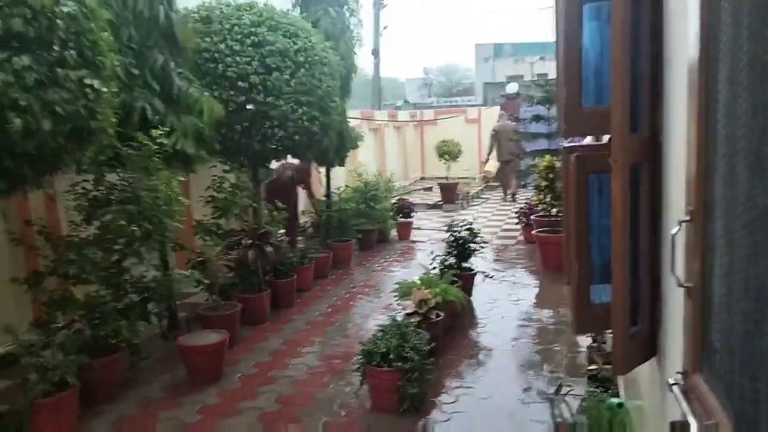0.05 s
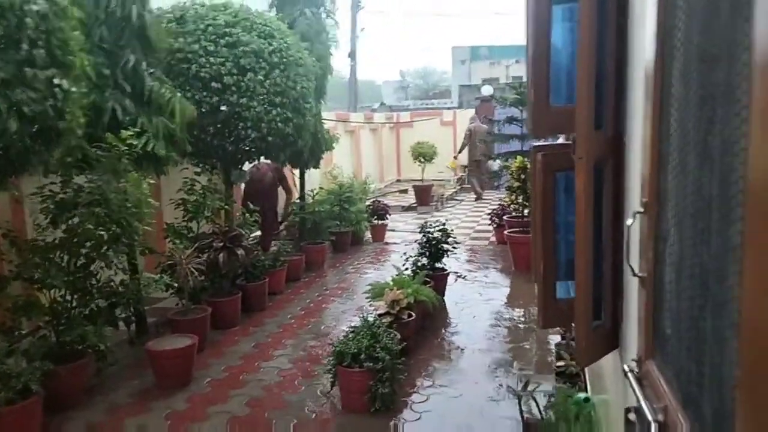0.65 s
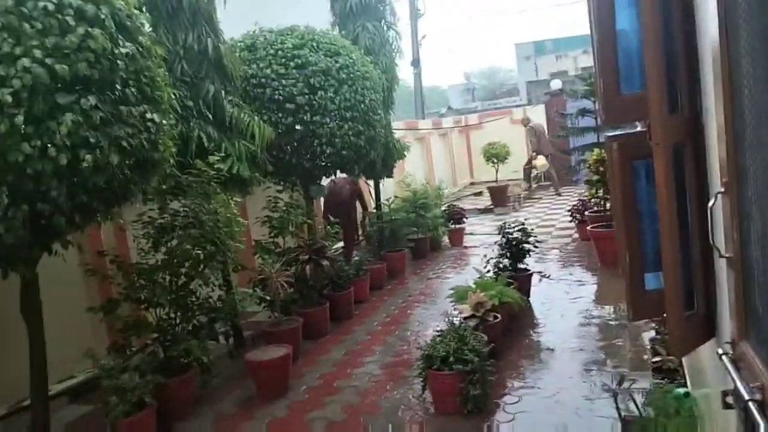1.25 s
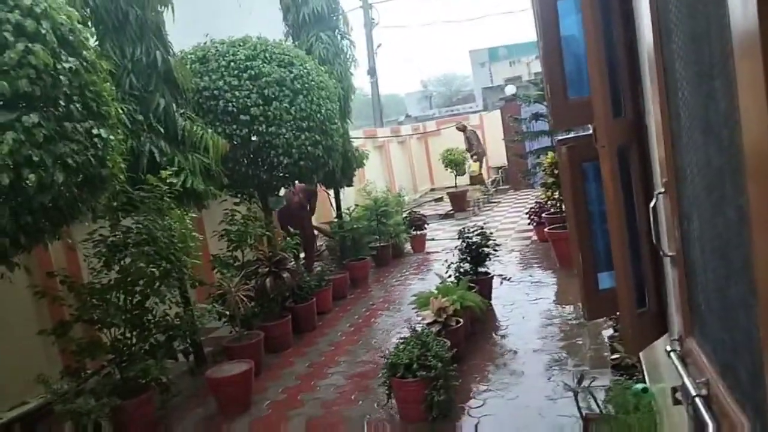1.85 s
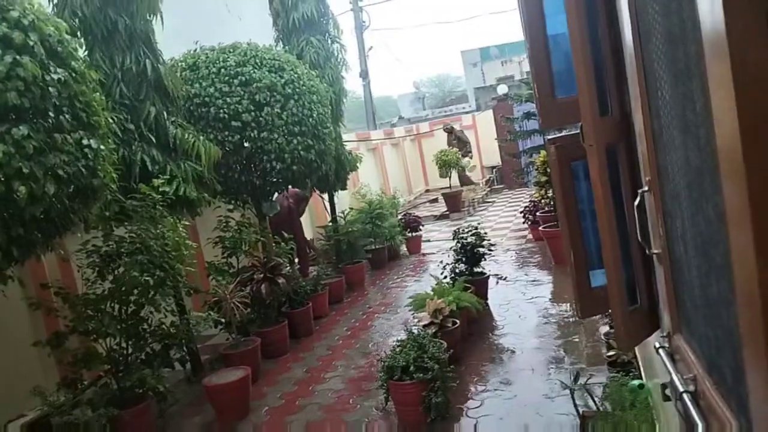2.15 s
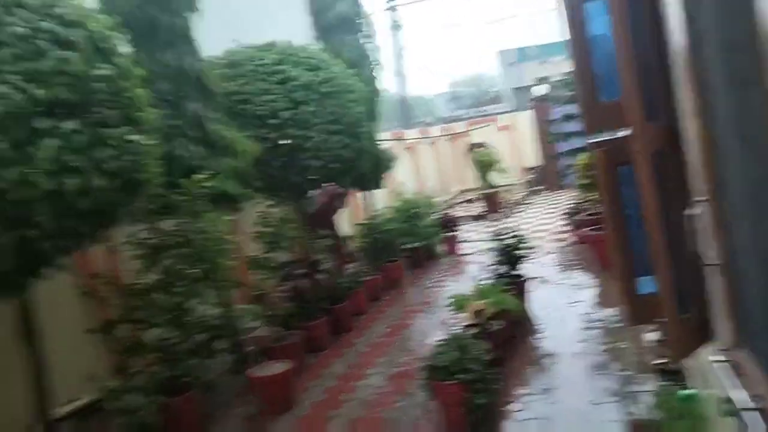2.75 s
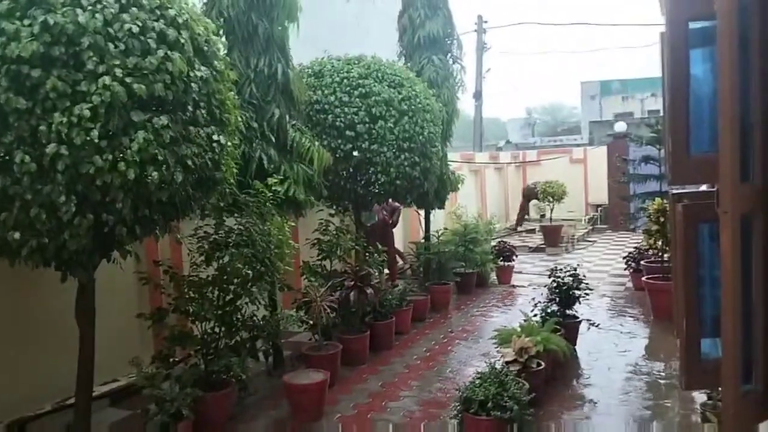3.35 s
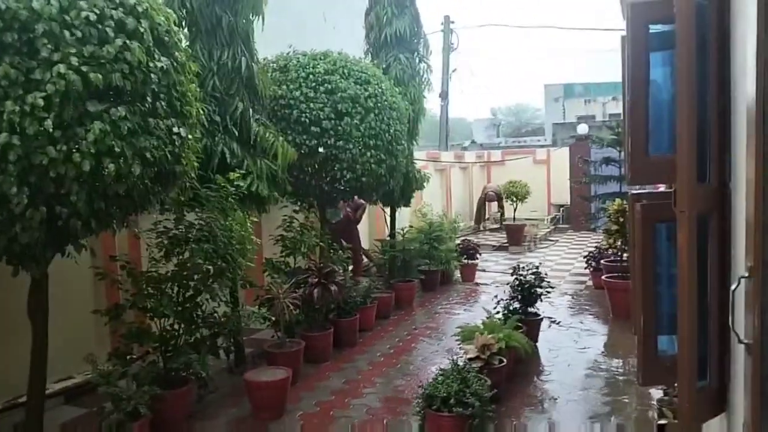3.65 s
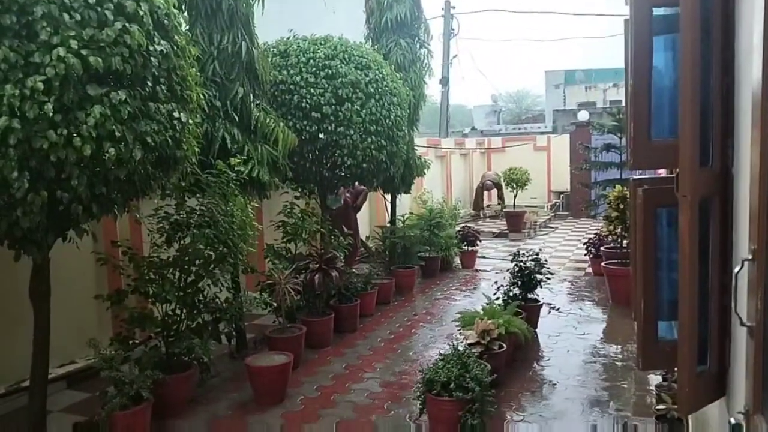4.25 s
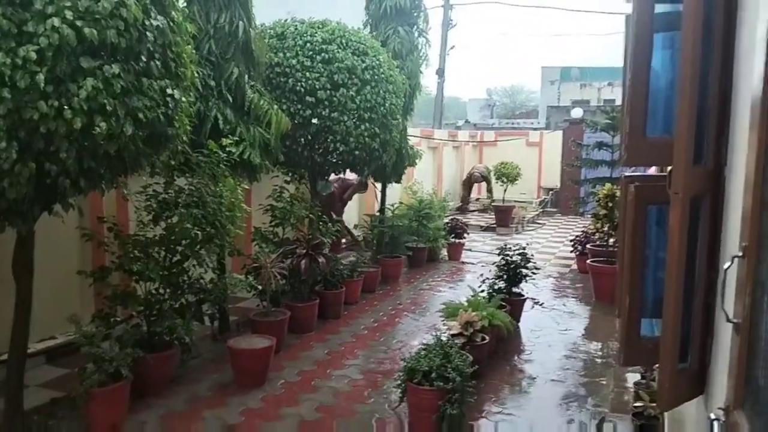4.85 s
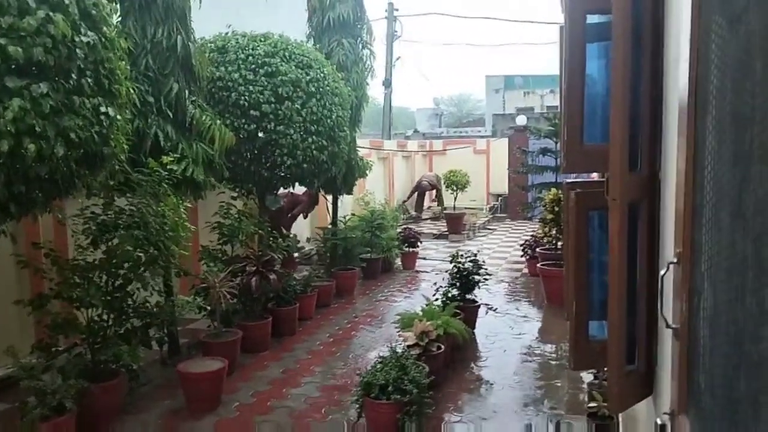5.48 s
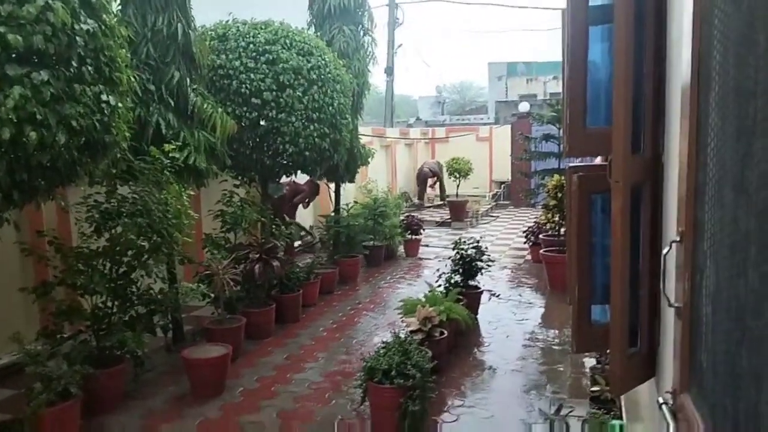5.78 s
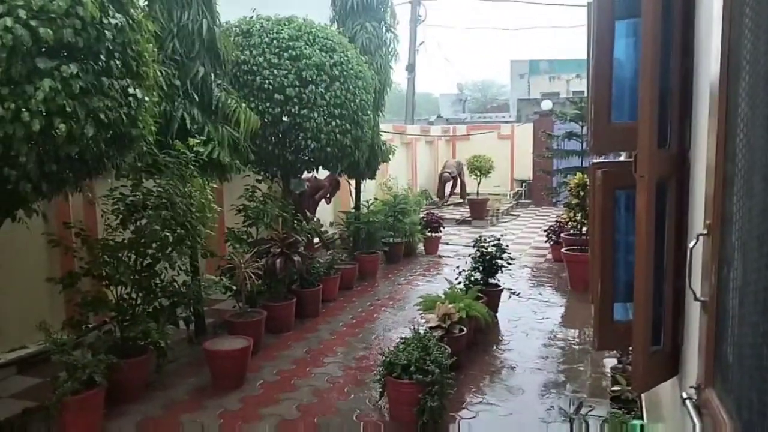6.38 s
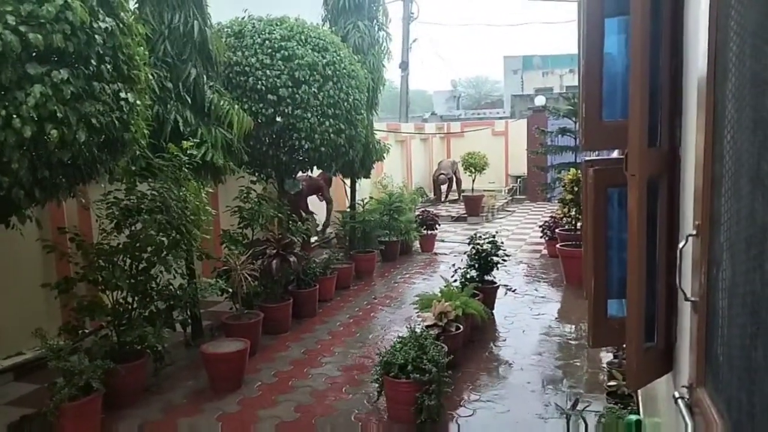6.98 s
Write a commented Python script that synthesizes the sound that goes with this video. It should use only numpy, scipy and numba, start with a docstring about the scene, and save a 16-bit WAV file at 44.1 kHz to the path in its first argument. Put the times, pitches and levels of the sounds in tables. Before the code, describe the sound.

Steady heavy rain washes over a paved courtyard full of plants, heard from a doorway, with fat drops splashing close by. Thunder builds after about a second, then breaks into a loud run of cracking, booming claps that briefly pushes the rain down. It rolls on in weaker, duller booms. Late on, a piece of metal clinks faintly and clanks a little to the right while the rain continues.

```python
"""Thunder over a rainy courtyard

Heavy rain on paving and plants, heard from a doorway. Shocks from the lightning channel build, crash
and roll on in claps over a distant roll. Fat drops splash close by, a struck piece of metal clinks
and clanks, and behind them small drops patter over a wash. A phone's limiter ducks it all at the crash."""
import sys
import numpy as np
from scipy import signal
from scipy.fft import rfft, irfft
from scipy.io import wavfile
from scipy.ndimage import uniform_filter1d, minimum_filter1d
from numba import njit

SR = 44100
rng = np.random.default_rng(int(sys.argv[2]) if len(sys.argv) > 2 else 0)


def generate_wav(signal):
    """Clip the signal to [-1, 1] and save it as 16-bit WAV at the path in sys.argv[1]."""
    frames = np.transpose(np.atleast_2d(signal))
    scaled = np.clip(frames, -1, 1) * 32767
    pcm = np.round(scaled).astype(np.int16)
    wavfile.write(sys.argv[1], SR, pcm)


N = 318402
TIME = np.arange(N) / SR


# EQ of thunder after its path through the air: f/Hz, gain/dB
THUNDER_EQ = [(18, -29), (28, -14), (55, -2.5), (78, -4), (108, -3), (145, -1.5), (185, -7.5), (270, -7.5),
              (370, -10.5), (520, -17), (800, -23), (1100, -31.5), (2300, -54), (3600, -77)]
def thunder():
    """Kinks in the lightning channel send a dense crowd of shocks, dulled by the air."""
    shocks = doorway(scatter(rate=1300, spread_db=2, lead_ms=.26, lead_spread_ms=.18))
    dulled = colour(shocks, THUNDER_EQ)
    rumble = steady(band(dulled, "low", 81.4), seconds=.11)
    boom = steady(band(dulled, "band", [86, 250]), seconds=.0613)
    thud = steady(band(dulled, "band", [92, 150]), seconds=.06)
    thud = np.roll(thud, N // 2, axis=1)  # shifted, so its shocks are not the boom's
    tear = steady(courtyard(band(dulled, "high", 255), t60=1, wet_db=-14), seconds=.14)
    # the claps and the far roll ride the faders of these four beds
    clap_boom, clap_rumble, cracks = claps(shocks)
    far_boom, far_rumble = far_roll()
    return (boom * np.hypot(far_boom, clap_boom)
            + rumble * np.hypot(far_rumble, clap_rumble)
            + thud * clap_rumble * undb(.5)  # the heaviest shocks are long ones
            + tear * np.hypot(far_boom * undb(-2.5), clap_boom * undb(-8.5))
            + cracks)


# clap cues: t/s, boom/dB, rumble/dB, crackle/dB, crackle low-pass/Hz, rise/s, decay/s
CLAP_CUES = [(1.28, -18.5, -31, -32, 605, 0.037, 0.46), (1.574, -11, -30, -12, 514, 0.01, 0.075),
             (1.86, -56, -54, -23, 556, 0.022, .12), (2.234, -4.5, -6, -14.5, 2290, 0.0058, 0.066),
             (2.306, 1.5, -2, -8, 4300, 0.008, 0.034), (2.345, -1, -3, -15, 2530, 0.0073, 0.25),
             (2.528, -0.5, -3, -22, 2400, 0.013, 0.23), (2.66, -12, -9, -11.5, 1110, 0.0069, 0.063),
             (2.743, 0.5, -13, -12.5, 1800, .003, 0.067), (2.82, -6, -20, -23.5, 1770, 0.01, 0.43),
             (2.94, -9, -8.5, -21, 905, 0.046, 0.039), (3.273, -7, -15.5, -20, 600, 0.01, .13),
             (3.48, -19, -33, -18, 625, 0.03, 0.28), (3.62, -7.5, -20, -17, 750, 0.024, 0.04),
             (3.89, -26, -39, -13.5, 475, 0.076, 0.045), (4.31, -33, -41, -24, 606, 0.019, 0.086),
             (4.70, -34, -44, -22, 650, 0.075, 0.094), (4.834, -11, -40, -15, 540, 0.012, 0.022),
             (4.896, -11, -38, -38, 500, .004, 0.016), (5.045, -12.5, -32, -30, 990, 0.016, 0.13),
             (5.088, -6, -40, -23, 915, 0.0038, 0.033), (5.543, -10, -16.5, -33, 1120, 0.0051, 0.12),
             (6.02, -17.5, -29, -32, 446, 0.074, 0.22), (6.2, -13.5, -40, -9.5, 370, 0.0096, 0.033),
             (6.28, -27, -25, -15, 1400, 0.062, 0.12), (6.52, -20, -58, -47, 497, 0.019, 0.11),
             (6.812, -11, -29, -37, 427, 0.02, 0.04), (6.98, -36, -36, -21.5, 580, 0.015, .3)]
# EQ of the crackle: f/Hz, gain/dB
CRACKLE_EQ = [(200, -29), (330, 10), (600, -3.5), (1000, -12.5), (1500, -13), (2400, -15.5), (3300, -27.5),
              (6000, -28), (12000, -43)]
def claps(shocks):
    """Long straight stretches of the channel land as claps: boom and rumble envelopes, plus crackle."""
    crackle = steady(colour(courtyard(shocks, t60=.23, wet_db=0), CRACKLE_EQ), seconds=.0204)
    boom_power, rumble_power, cracks = 0, 0, 0
    for start, boom_db, rumble_db, crackle_db, top_hz, rise, decay in CLAP_CUES:
        swell = fade(start, decay, rise)
        low_swell = fade(start, decay * 1.08, rise + .025)  # the low end blooms later and hangs on
        boom_power += (undb(boom_db) * swell) ** 2
        rumble_power += (undb(rumble_db) * low_swell) ** 2
        # each clap has its own crackle; the longer the path through the air, the darker it is
        own_crackle = np.roll(crackle, rng.integers(N), axis=1)
        cracks += undb(crackle_db) * swell * band(own_crackle, "low", top_hz)
    return np.sqrt(boom_power), np.sqrt(rumble_power), cracks


# fader moves of the distant roll: t/s, boom/dB, rumble/dB
ROLL_FADERS = [(0, -35.5, -49), (1.2, -28, -36.5), (1.85, -27.5, -52), (2.15, -29, -38),
               (3.9, -31.5, -26.5), (4.55, -30, -35.5), (5.1, -21.5, -45), (5.4, -26.5, -33),
               (5.9, -28, -36), (6.4, -25, -43), (7.2, -26, -34)]
def far_roll():
    """Boom and rumble envelopes of the distant thunder, swelling and sagging at random."""
    times, *faders = np.transpose(ROLL_FADERS)
    return [undb(np.interp(TIME, times, db) + .58 * walk(rate=13)) for db in faders]


# fat drops near the door: t/s, spray level/dB, plink f/Hz, spray decay/s
DROP_CUES = [(0.417, -25.5, 6200, 0.0019), (0.427, -26.5, 13000, 0.014), (1.198, -31, 11100, 0.046),
             (1.511, -27.5, 5200, .008), (2.026, -32.5, 12500, .007), (2.082, -33.5, 10200, 0.02),
             (3.893, -29.5, 11700, .001), (4.238, -30, 5650, 0.0066), (4.359, -33, 6370, .008),
             (4.476, -29.5, 12350, 0.035), (4.803, -32.5, 11500, 0.019), (5.92, -32.5, 13000, 0.014),
             (6.68, -36.5, 12100, 0.069), (7.103, -30.5, 5500, 0.0021), (7.15, -29, 2650, .003)]
# EQ of the spray: f/Hz, gain/dB
SPRAY_EQ = [(1000, -14), (3000, -6), (5500, -2.5), (9000, -5.5), (12500, -7), (16000, 3.5)]
def splashes():
    """A fat drop hits wet paving with a sharp tick and a plink, then bursts into droplets."""
    droplets = scatter(rate=16000, spread_db=2, lead_ms=0, lead_spread_ms=.3)
    spray = level(colour(droplets, SPRAY_EQ))
    drops = 0
    for start, db, hz, decay in DROP_CUES:
        tick = undb(8.5) * fade(start, decay=.00031, rise=.00041)
        burst = spray * undb(db) * (tick + fade(start, decay, rise=.00099))
        plink = undb(3) * resonance(burst, hz, width=1600)
        drops += burst + plink
    return courtyard(drops, t60=.3, wet_db=-7)


# hits on the metal: t/s, relative level/dB
METAL_HITS = [(.33, -35), (4.76, -36.5), (5.06, -35), (5.32, -37), (5.706, -30), (5.737, -20.5),
              (5.853, -27)]
# its ringing modes: f/Hz, relative level/dB, t60/s
METAL_MODES = [(982, 5, 0.15), (1200, -19, .35), (1436, -9, .28), (1920, -8, 0.3), (1997, -4, .35),
               (2172, -5, 0.44), (2360, -2, 0.2), (2365, -5, .27), (2660, -11, .35), (2880, -15, .22),
               (3220, 0, 0.12), (3880, -17, 0.45), (4720, -13, 0.16), (5050, -19, .2)]
# EQ of the contact scrape: f/Hz, gain/dB
SCRAPE_EQ = [(500, 0), (1000, -3), (2300, 8), (3400, -4.5), (5200, -11), (8000, -32)]
def clank():
    """Each hit rattles a metal piece off to the right; every rough contact rings its modes afresh."""
    bounce_s, bounce_db = .0195, -3
    contacts = [(start + k * bounce_s, db + k * bounce_db) for start, db in METAL_HITS for k in range(4)]
    t = TIME[:SR // 2]
    hz, mode_db, t60 = np.transpose(METAL_MODES)[:, :, None, None]
    modes = undb(mode_db) * np.exp((2j * np.pi * hz - np.log(1000) / t60) * t)
    attack = np.minimum(t / .0015, 1)
    ring = np.zeros((2, N))
    for start, db in contacts:
        at = int(start * SR)
        phases = np.exp(2j * np.pi * rng.random((len(METAL_MODES), 2, 1)))
        ring[:, at:at + len(t)] += undb(db) * np.sum(modes * phases, axis=0).imag * attack
    touch = sum(undb(db) * fade(start, decay=.018, rise=.0012) for start, db in contacts)
    scrape = level(colour(rng.standard_normal((2, N)), SCRAPE_EQ), -8.5) * touch
    pan = undb([[-1.5], [1.5]])
    return (undb(-5) * ring + courtyard(scrape, t60=.55, wet_db=2)) * pan


# EQ of rain on leaves and puddles: f/Hz, gain/dB
RAIN_EQ = [(200, -7.5), (400, 0), (700, 3.5), (1000, -2), (1300, -4), (1750, -5.5), (2050, -4), (2450, -8),
           (2800, -12), (3600, -12.5), (5200, -14), (9000, -20.5), (12000, -17), (14300, -17)]
def rain():
    """Countless far drops merge into a dark wash; nearer ones tick brightly on leaves and puddles."""
    wash_db, patter_db = -34.5 - .05 * TIME, -40 - .52 * TIME  # both ease off
    flutter = undb(.071 * walk(rate=9.7) + .5 * walk(rate=25))
    wash = rng.standard_normal((2, N)) * flutter
    ticks = scatter(rate=2200, spread_db=2, lead_ms=0, lead_spread_ms=.4)
    patter = courtyard(ticks, t60=.2, wet_db=3)
    far = level(band(colour(wash, RAIN_EQ), "low", 8300, order=1), wash_db)
    near = level(band(colour(patter, RAIN_EQ), "high", 3000, order=1), patter_db + .6 * walk(rate=9.7))
    bed = far + near
    # the door on the right throws the mids back and shades the treble
    mids = band(bed, "band", [700, 4000], order=1)
    return bed * undb([[.7], [-.7]]) + mids * np.array([[-.24], [.24]])


# resonances of doorway and porch: f/Hz, width/Hz, boost/dB
DOORWAY_MODES = [(52, 4.2, 11), (110, 27, 1), (146.3, 38, 2), (271, 10, 1), (351.7, 9.5, 5), (460, 18, 0),
                 (658, 19, 3.5), (795, 52, 4), (990, 51, 4.5), (1140, 54, 0.5), (1227, 44, 3.5)]
def doorway(x):
    """Standing waves between door, walls and floor lift narrow bands."""
    return x + sum((undb(db) - 1) * resonance(x, hz, width) for hz, width, db in DOORWAY_MODES)


def courtyard(x, t60, wet_db):
    """Walls and paving add a diffuse reverb tail."""
    t = TIME[:SR // 2]
    tail = rng.standard_normal((2, len(t))) * np.exp(-np.log(1000) * t / t60)
    return x + undb(wet_db) * convolve(x, tail / np.sqrt(np.sum(tail[0] ** 2)))


def scatter(rate, spread_db, lead_ms, lead_spread_ms):
    """Random clicks of uneven size; each one's direction sets how far the left channel leads."""
    count = int(rate * N / SR)
    when, size, sign, direction = rng.random((count, 4)).T
    size = np.sign(sign - .5) * undb(-spread_db * np.log(np.maximum(size, 1 / count)))
    lead_ms = lead_ms + lead_spread_ms * np.log(direction / (1 - direction)) / 2
    left_at = (when * N).astype(int)
    right_at = left_at + np.round(lead_ms * SR / 1000).astype(int)
    return np.array([np.bincount(at % N, size, N) for at in (left_at, right_at)])


def undb(db):
    return 10 ** (np.asarray(db) / 20)


def level(x, db=0):
    """Normalise to rms 1, then apply a gain."""
    return x * undb(db) / np.sqrt(np.mean(x ** 2))


def steady(x, seconds):
    """Even out the slow loudness, leaving the fine grain at rms 1."""
    return x / np.sqrt(uniform_filter1d(np.mean(x ** 2, axis=0), int(seconds * SR)) + 1e-12)


def walk(rate):
    """Random levels held 1 / rate s and slewed."""
    hold = int(SR / rate)
    return 3.4 * uniform_filter1d(np.repeat(rng.standard_normal(N // hold + 1), hold), hold)[:N]


def fade(start, decay, rise):
    """Quick swell, exponential decay; times in s."""
    age = np.maximum(TIME - start, 0)
    return (1 - np.exp(-(age / rise) ** 2)) * np.exp(-np.maximum(age - rise, 0) / decay)


def convolve(x, response):
    return signal.fftconvolve(x, np.atleast_2d(response), axes=1)[:, :N]


def colour(x, points, size=8192):
    """Minimum-phase EQ through points of f/Hz, gain/dB."""
    hz, db = np.transpose(points)
    grid = np.maximum(np.fft.rfftfreq(size, 1 / SR), 1)
    gain = undb(np.interp(np.log(grid), np.log(np.maximum(hz, 1)), db))
    cepstrum = irfft(np.log(gain))
    cepstrum[1:size // 2] *= 2
    cepstrum[size // 2 + 1:] = 0
    return convolve(x, irfft(np.exp(rfft(cepstrum))))


def band(x, kind, hz, order=4):
    return signal.sosfilt(signal.butter(order, hz, kind, fs=SR, output="sos"), x)


def resonance(x, hz, width):
    """Band-pass with gain 1 at the centre."""
    return signal.lfilter(*signal.iirpeak(hz, hz / width, fs=SR), x)


@njit
def follow(x, release):
    """Envelope that catches each peak and sinks slowly."""
    envelope, held = np.empty(len(x)), 0.
    for i in range(len(x)):
        held = max(x[i], held * (1 - release))
        envelope[i] = held
    return envelope


def scene():
    return thunder() + rain() + splashes() + clank()


def record(dry):
    """The phone ducks on loud peaks and recovers slowly; a fast limiter and a high cut follow."""
    window_s, release_s, threshold_db = .04, .95, -5.8
    ceiling, top_hz = .9, 14350
    loudness = np.sqrt(uniform_filter1d(np.mean(dry ** 2, axis=0), int(window_s * SR)) + 1e-12)
    ducked = dry / np.maximum(follow(loudness, 1 / (release_s * SR)) / undb(threshold_db), 1)
    peak_gain = np.minimum(ceiling / (np.abs(ducked).max(axis=0) + 1e-9), 1)
    limited = ducked * uniform_filter1d(minimum_filter1d(peak_gain, size=161), size=161)
    return signal.sosfilt(signal.ellip(12, .2, 70, top_hz, fs=SR, output="sos"), limited)


dry = scene()
out = record(dry)
generate_wav(out)
```